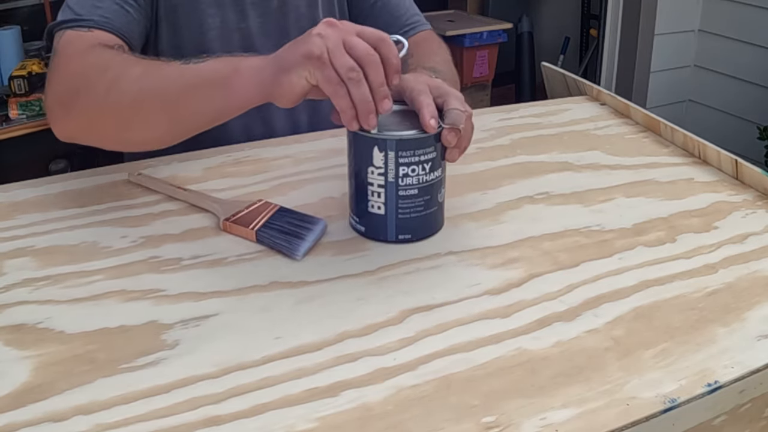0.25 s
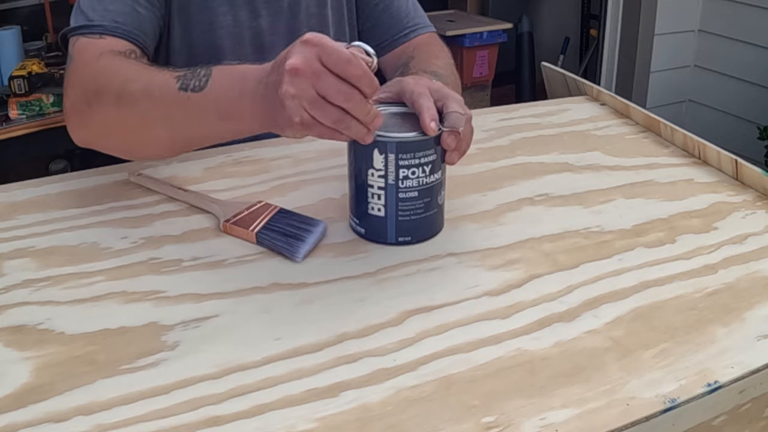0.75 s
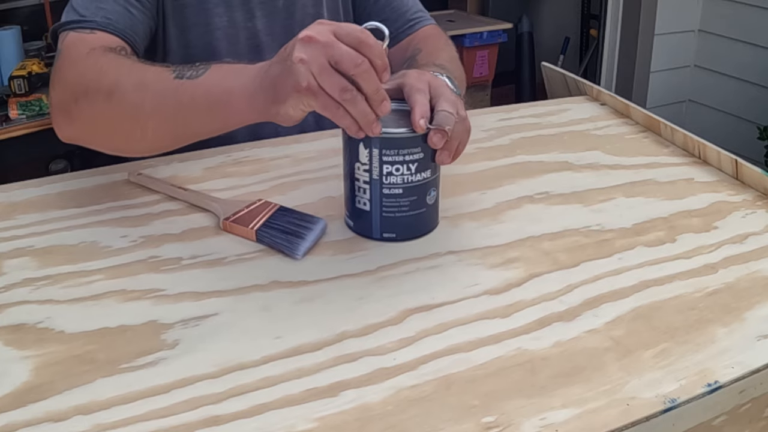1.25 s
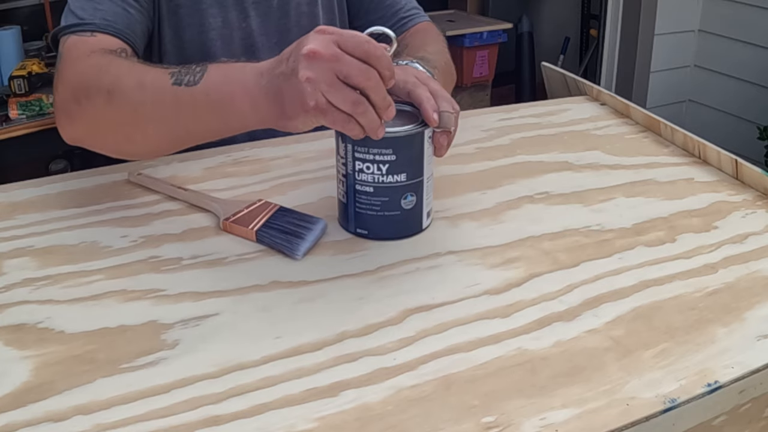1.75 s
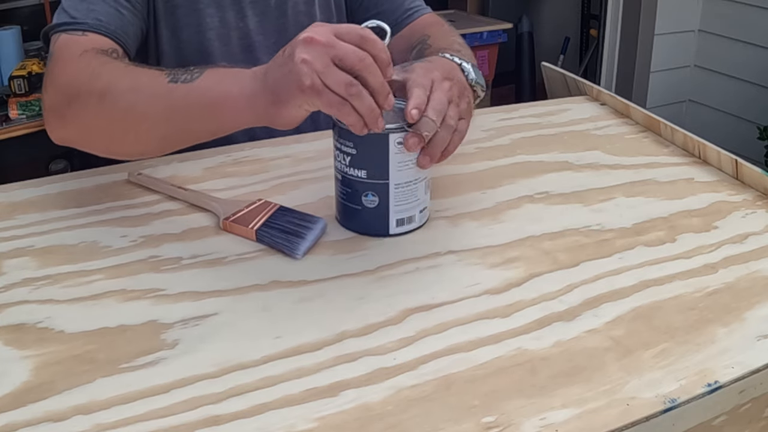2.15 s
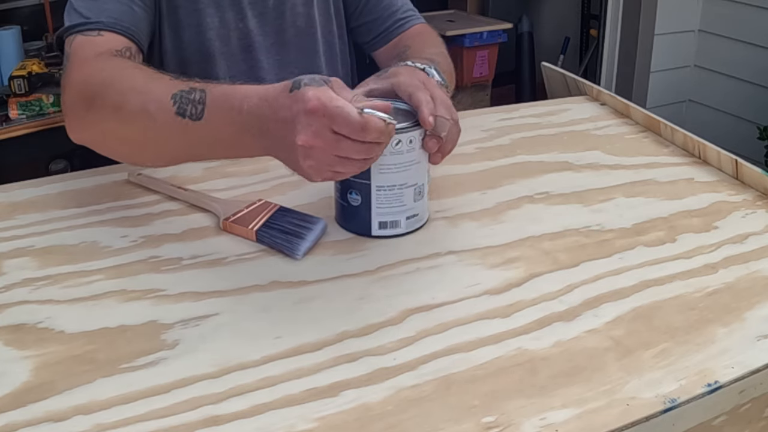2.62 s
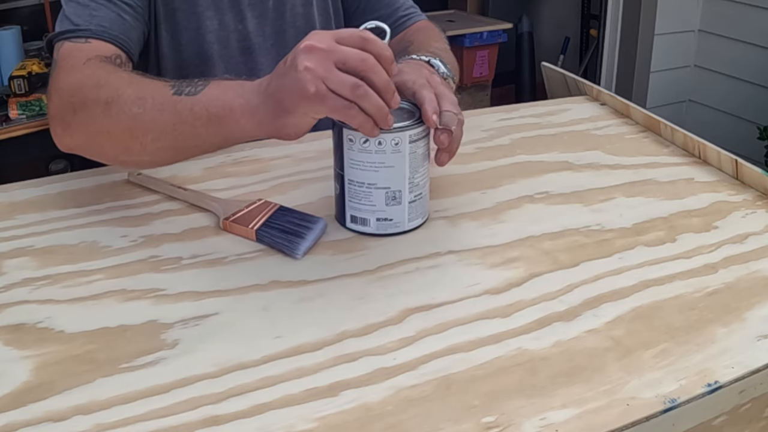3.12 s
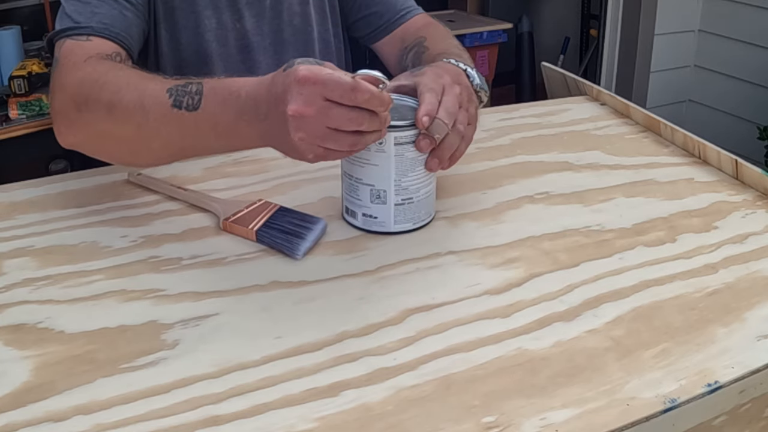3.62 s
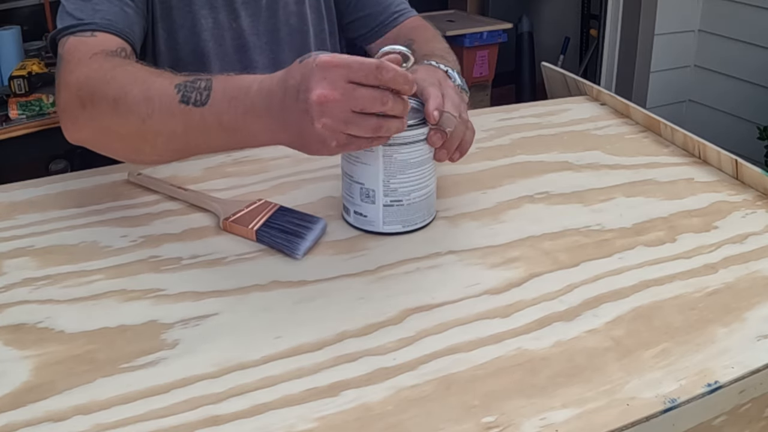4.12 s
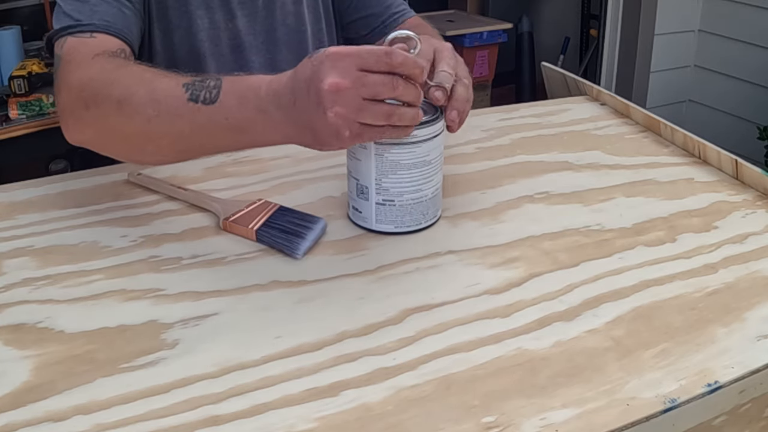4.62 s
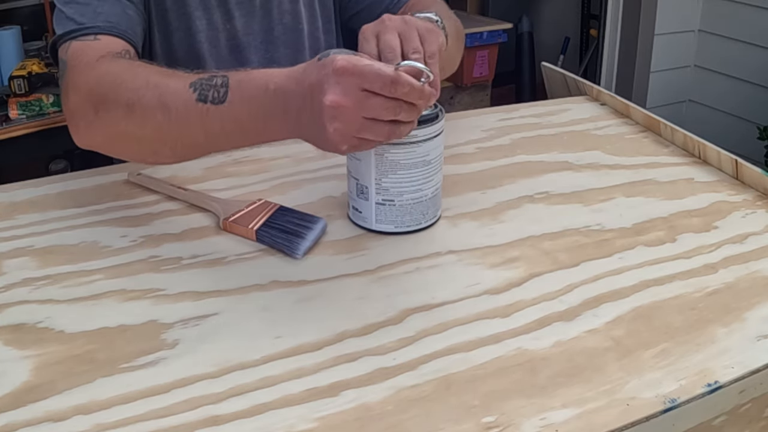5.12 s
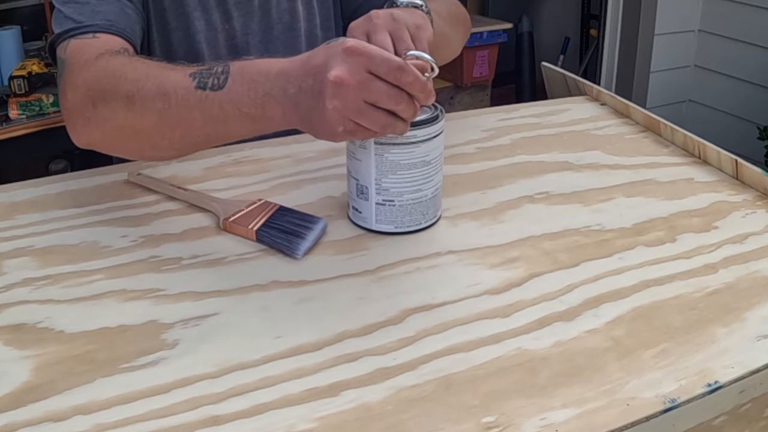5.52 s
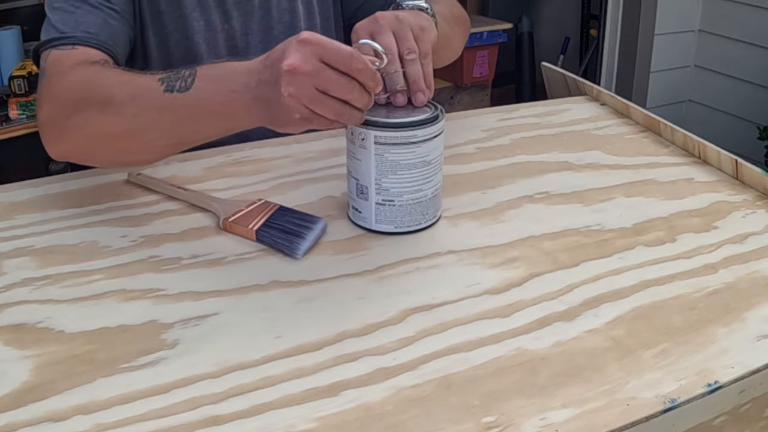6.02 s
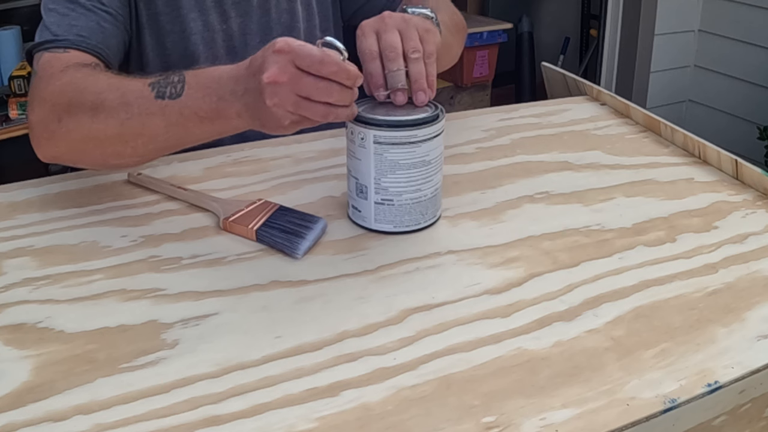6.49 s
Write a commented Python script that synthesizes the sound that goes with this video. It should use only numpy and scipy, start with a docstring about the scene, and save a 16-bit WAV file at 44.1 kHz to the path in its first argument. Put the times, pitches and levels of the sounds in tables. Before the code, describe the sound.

Sharp clicks and a ringing snap of a paint can lid being pried, with gritty turns on a wooden bench and light wind.

```python
"""A steel key pries round the lid of a full paint can on a plywood bench in an open workshop.
A machine drones outside throughout. First the key clicks on the rim, then slips off with a ringing snap.
A draught starts to buffet the microphone, a brief hiss swells close by, and the can is turned in short
goes, rasping on the wood, while an insect trills faintly now and then and fingers shift their grip.
More clicks follow, and near the end the key scrapes along the rim, squeaks and clicks a last time."""
import sys
import numpy as np
from scipy import signal
from scipy.fft import rfft, irfft
from scipy.io import wavfile
from scipy.ndimage import uniform_filter1d, map_coordinates

SR = 44100
rng = np.random.default_rng(int(sys.argv[2]) if len(sys.argv) > 2 else 0)


def generate_wav(signal):
    """Clip the signal to [-1, 1] and save it as 16-bit WAV at the path in sys.argv[1]."""
    frames = np.transpose(np.atleast_2d(signal))
    scaled = np.clip(frames, -1, 1) * 32767
    pcm = np.round(scaled).astype(np.int16)
    wavfile.write(sys.argv[1], SR, pcm)


N = 297675
TIME = np.arange(N) / SR
GRIP_S = 0.025  # how fast the gripping hand damps the can

# The notes of the full can. Each row: pitch in Hz, level in dB, seconds to fade by 60 dB.
CAN_NOTES = [(628, 0, .15), (680, -9, .05), (845, -10, .09), (1810, -23, .04), (3640, -31, .04)]
# The tone of four kinds of noise. Each row: frequency in Hz, level in dB.
LID_CLACK = [(150, -17), (600, 1), (1000, 12.5), (1400, 4.5), (1900, 0.5), (2400, -1.5), (3200, 1.5),
             (4100, -15), (6000, -10.5), (14000, -66)]
STEEL_TICK = [(1500, -32), (4000, -21.5), (4800, -2), (5800, -0.5), (7000, -10.5), (9000, -15),
              (11500, -16.5), (14000, -41)]
BENCH_THUD = [(35, -12.5), (70, 6.5), (200, -2.5), (420, -4.5), (700, -13), (1100, -22.5), (3000, -32),
              (14000, -109)]
GRIT_TONE = [(210, -1.5), (350, -4.5), (469, -17), (629, 4), (723, -19.5), (1020, -6), (1400, -11.5),
             (1850, -11.5), (2160, -17), (2640, -15.5), (3600, -20), (4200, -23.5), (5810, -29),
             (8160, -34.5), (11800, -38), (14000, -56)]


def amp(db):
    """Turns decibels into a number to multiply by."""
    return 10 ** (np.asarray(db) / 20)


def unit(x):
    """Scales a sound to an average (rms) level of 1."""
    return x / np.sqrt(np.mean(x ** 2) + 1e-20)


def struck(x, size=882):
    """Scales a blow to an average level of 1 over its first samples, normally 20 ms of them."""
    return x / np.sqrt(np.mean(x[:size] ** 2) + 1e-20)


def read(points, hz):
    """Looks up a value between a table's rows, spacing the frequencies by octaves."""
    row_hz, value = np.transpose(points)
    return np.interp(np.log(hz + 1), np.log(row_hz + 1), value)


def add(mix, s, sound):
    """Mixes a sound in, starting at s seconds."""
    part = mix[max(round(s * SR), 0):][:len(sound)]
    part += sound[:len(part)]


def colour(x, tone, size=4096):
    """Gives a sound the tone in a table, with a filter that never rings ahead of a blow."""
    log_gain = np.log(amp(read(tone, abs(np.fft.fftfreq(size, 1 / SR)))))
    taps = np.fft.ifft(np.exp(np.conj(signal.hilbert(log_gain)))).real[:size // 2]
    return signal.fftconvolve(x, taps)[:len(x)]


def wander(hz):
    """A random wobble of average size 1, moving up to about hz times a second."""
    keep_slow = 1 / (1 + (np.fft.rfftfreq(N, 1 / SR) / hz) ** 4)
    return unit(irfft(rfft(rng.standard_normal(N)) * keep_slow, N))


def ring(notes, t, detune=0.):
    """The fading notes of a struck object; detune shifts each pitch by chance."""
    return sum(amp(db - 60 * t / fade_s) * np.sin(2 * np.pi * hz * (1 + detune * rng.standard_normal()) * t)
               for hz, db, fade_s in notes)


def contact(t, fade_s, crunch, rise_s=0.00047):
    """The force of one sharp impact and a short crunch of steel on steel."""
    force = rng.standard_normal(len(t)) * np.exp(-t / fade_s) * (1 - np.exp(-t / rise_s))
    force *= crunch / np.linalg.norm(force)
    force[0] += 1
    return force


def stroke(start, length, change_db, attack_s, release_s, grab_db=0, grab_s=0.02):
    """Loudness of one movement: it breaks free (grab_db louder), swells or eases, and dies away."""
    t = np.maximum(TIME - start, 0)
    attack = np.minimum(t / attack_s, 1)
    push_db = grab_db * np.exp(-(t / grab_s) ** 2) + change_db * np.minimum(t / length, 1)
    release = np.exp(-np.maximum(t - length, 0) / release_s)
    return attack * amp(push_db) * release


def slips(per_s, spread_db, judder_db, smooth):
    """The force of friction: uneven little slips over a smooth rub, coming in clumps."""
    slipping = rng.random(N) < per_s / SR
    sizes = amp(spread_db * np.minimum(rng.exponential(1, N), 4))
    jolts = slipping * sizes * rng.choice([-1, 1], N)
    return (unit(jolts) + smooth * rng.standard_normal(N)) * amp(judder_db * wander(42))


def rubbed(force, notes, damp_s, pitch_ratio, drift=.018):
    """Rubbing sounds an object's notes, damped by the hand; they drift as the contact travels."""
    t = TIME[:SR // 2]
    sound = signal.fftconvolve(force, ring(notes, pitch_ratio * t) * np.exp(-t / damp_s))[:N]
    position = np.cumsum(1 + drift * wander(14))
    return unit(map_coordinates(sound, [position], order=3, mode="mirror"))


def outdoors(rumble_db=-42, hiss_db=-68.5, swell_db=0.27):
    """The open air: a far, gently swelling rumble and a faint hiss."""
    # The tone of each. Each row: frequency in Hz, level in dB.
    rumble_tone = [(15, -1), (45, 1), (75, 2.5), (90, 1.5), (125, 0), (145, -5.5), (170, -11), (250, -12.5),
                   (300, -15.5), (510, -18), (580, -22.5), (1000, -22), (1450, -27.5), (2100, -42),
                   (5000, -89)]
    hiss_tone = [(1500, -3.5), (2100, 1.5), (2800, 2.5), (3800, -4.5), (5500, -1.5), (7500, -7),
                 (8300, -14), (12000, -20), (14000, -32)]
    # How alike left and right are. Each row: frequency in Hz, likeness from 0 to 1.
    likeness = [(60, 0.99), (150, 1), (370, 0.89), (910, 0.43), (2260, 0.31), (5590, 0.7), (13800, 0.42)]
    hz = np.fft.rfftfreq(N, 1 / SR)
    left, other = rfft(rng.standard_normal((2, N)))
    same = np.clip(read(likeness, hz), 0, 1)
    noise = np.array([left, same * left + np.sqrt(1 - same ** 2) * other])
    rumble = unit(irfft(noise * amp(read(rumble_tone, hz)), N))
    hiss = unit(irfft(noise * amp(read(hiss_tone, hz)), N))
    return amp(rumble_db + swell_db * wander(9.9)) * rumble + amp(hiss_db) * hiss


def machine(waver_hz=2.87, flutter_db=1.9):
    """A distant machine drones on one low, wavering note."""
    # The course of the drone. Each row: time in seconds, pitch in Hz, level in dB.
    drone = [(0, 132.3, -44.5), (.8, 136.4, -59.5), (3.299, 130.5, -49.5), (4.3, 131.9, -49),
             (5.1, 129.5, -44.5), (6.75, 130, -47.5)]
    s, hz, db = np.transpose(drone)
    cycles = np.cumsum(np.interp(TIME, s, hz) + waver_hz * wander(9.46)) / SR
    loudness = uniform_filter1d(amp(np.interp(TIME, s, db)), size=300)
    return loudness * unit(np.sin(2 * np.pi * cycles) * amp(flutter_db * wander(14)))


def key_clicks(clack_db=-15, tick_db=-6, knock_db=-7, thud_db=-3):
    """Each bite of the key clacks the lid, rings the rim, knocks the can and thuds into the bench."""
    # Each row: time in seconds, strength in dB, then dB added to it for the can's knock, the steel's tick,
    # the rim's ring and the bench's thud, and last the fade time of the crunch in seconds.
    clicks = [(0.0367, -28, -3, -14.5, -26, -5.5, 0.0025), (0.0495, -30, 1, -19, -35, 0, 0.0017),
              (0.9732, -34.5, -13, -9.5, -18, -14, 0.0047), (1.2724, -42, -1, -21, -25, 5, 0.002),
              (2.092, -45.5, -1, -14.5, -19, -25, .003), (2.309, -39.5, -11, -14, -13, -22, 0.002),
              (2.716, -28, -28, -16, -29, 1, 0.0016), (2.7302, -25.5, -21, -12, -20.5, -13, 0.0014),
              (2.742, -39, -10, -28, -19, -14, 0.0072), (2.8337, -31, -5, -16, -34, -6, 0.0038),
              (3.067, -34.5, 2, -16, -37, -1.5, 0.0022), (3.184, -34, 1.5, -26, -39, -7, 0.0023),
              (3.213, -23, -10, -22, -26.5, -15, 0.002), (5.083, -45.5, -17, -8, -13, 1.5, 0.0025),
              (5.3755, -43.5, -7, -14, -10.5, 1, 0.0035), (5.574, -25.5, -7.5, -21, -30, -13.5, 0.00075),
              (5.635, -46, 5, -14.5, -18, -10, .003), (5.820, -45.5, -17, -7, -19, 5, 0.0075),
              (5.856, -37, -21, -7.5, -12.5, 0.5, 0.0057), (6.65, -40.5, 0, -33, -17, 2, 0.0024)]
    out, t = np.zeros(N), TIME[:SR // 3]
    for s, db, can_db, steel_db, rim_db, bench_db, crunch_s in clicks:
        force = contact(t, crunch_s, crunch=12)
        add(out, s, amp(db + clack_db) * struck(colour(force, LID_CLACK)))
        add(out, s, amp(db + steel_db + tick_db) * struck(colour(force, STEEL_TICK)))
        add(out, s, amp(db + rim_db) * struck(signal.fftconvolve(force, rim_ring(t, detune=0.027))))
        knock = ring(CAN_NOTES, t, detune=0.041) * np.exp(-t / GRIP_S)
        add(out, s, amp(db + can_db + knock_db) * struck(knock))
        thud = colour(contact(t, fade_s=0.029, crunch=4.6), BENCH_THUD)
        add(out, s, amp(db + bench_db + thud_db) * struck(thud))
    return out


def rim_ring(t, detune, top_hz=12600):
    """The rim's ring, shifted by where it is touched; its highest treble is damped."""
    return signal.sosfilt(signal.butter(4, top_hz, fs=SR, output="sos"), ring(rim_notes(), t, detune))


def rim_notes():
    """The notes of the steel rim, whether it is struck or rubbed."""
    # Each row: pitch in Hz, level in dB, seconds to fade by 60 dB.
    notes = [(1450, 1, 0.028), (2660, -6, 0.02), (3380, -3, 0.027), (3670, -4, 0.028), (4620, -9, 0.022),
             (5020, -6, 0.022), (5430, -2, 0.02), (5830, -6, 0.022), (6400, -8, 0.018), (7150, -11, 0.017),
             (8550, -17, 0.01), (9800, -17, 0.014), (10300, -18, 0.014), (12000, -18, 0.012)]
    return notes


def panel_bumps():
    """As the can rocks or the lid flexes, one panel gives way and swings, making a bump or a ping."""
    # Each row: start in seconds, level in dB, pitch in Hz, seconds to fade by 60 dB.
    bumps = [(0.0367, -41, 1380, 0.0032), (0.0488, -56, 4800, 0.016), (0.037, -49, 2650, 0.061),
             (0.0505, -32, 670, 0.035), (2.7145, -32.5, 595, 0.067), (2.7155, -50, 3050, 0.0096),
             (2.717, -38, 405, 0.022), (2.7232, -21, 153.5, 0.071), (2.732, -40.5, 1480, 0.0066),
             (2.733, -39, 832, 0.064), (2.834, -48.5, 2650, 0.01), (3.031, -30, 146, 0.053),
             (3.068, -43.5, 646, 0.16), (3.214, -48, 820, .09), (3.881, -58.5, 3180, 0.0092),
             (5.574, -38, 1005, 0.012), (5.5754, -35, 241, 0.029), (5.5735, -49.5, 5530, 0.0081),
             (5.635, -49.5, 1490, 0.014), (5.8565, -38.5, 397, 0.027), (6.649, -52.5, 2520, 0.0075)]
    out, t = np.zeros(N), TIME[:SR // 3]
    for s, db, hz, fade_s in bumps:
        swing = ring([(hz, 0, fade_s)], t) * (1 - np.exp(-t * hz))
        add(out, s, amp(db) * struck(swing))
    return out


def lid_snap(at_s=0.3555, skid_s=0.003, rebound_s=0.0049,
             skid_db=-42, lid_db=-29, rebound_db=-15, clack_db=-33, thud_db=-29):
    """The key skids ever faster and slips off; the strained lid springs back, rings and rebounds once."""
    # The notes of the lid. Each row: pitch in Hz, level in dB, seconds to fade by 60 dB.
    lid_notes = [(945, -10, 0.28), (987, 12, 0.015), (1270, -14, 0.2), (1410, 3.5, 0.023),
                 (1610, -6, 0.059), (2110, -8, 0.091), (2680, -9.5, 0.16), (2770, 14.5, 0.013),
                 (2880, 0, 0.019), (3300, -19, 0.23), (3630, 3, 0.022), (4030, -21, .04), (4820, -8, 0.024),
                 (5500, -28, .12), (5940, 5, 0.0076), (7560, -5, 0.01), (8700, -6, 0.013)]
    out, t = np.zeros(N), TIME[:SR // 2]
    swell = np.linspace(0, 1, int(skid_s * SR) + 2) ** 2
    force = np.pad(swell * rng.standard_normal(len(swell)), (0, SR // 20))
    skid = struck(colour(force, STEEL_TICK)) + struck(colour(force, LID_CLACK))
    add(out, at_s - skid_s, amp(skid_db) * skid)
    lid = amp(lid_db) * struck(ring(lid_notes, t) * (1 - np.exp(-t / .0005)))
    add(out, at_s, lid)
    add(out, at_s + rebound_s, amp(rebound_db) * lid * np.exp(-t / GRIP_S))
    add(out, at_s, amp(clack_db) * struck(colour(contact(t, fade_s=0.00049, crunch=1.1), LID_CLACK)))
    add(out, at_s, amp(thud_db) * struck(colour(contact(t, fade_s=0.038, crunch=0.98), BENCH_THUD)))
    return out


def air_pressure(breeze_db=-35):
    """The push of air on each side of the microphone: smooth puffs over a light breeze."""
    # Each row: time of the puff's peak in seconds, length in seconds, level in dB, left minus right in dB.
    gusts = [(0.997, 0.043, -24, 0), (1.042, 0.072, -26.5, -4), (1.214, 0.14, -28, -7),
             (1.441, 0.018, -24.5, 5), (1.705, 0.13, -20, -3.5), (1.818, 0.044, -23, -5),
             (2.22, 0.066, -29.5, -8), (2.56, 0.056, -31.5, -6), (2.653, 0.064, -23, -7),
             (2.76, 0.13, -23.5, -4), (2.895, 0.036, -29.5, -7), (3.04, 0.019, -23, -7),
             (3.113, 0.052, -35.5, 5), (4.005, 0.15, -30.5, -1.5)]
    breeze = amp(breeze_db) * stroke(start=0.862, length=2.11, change_db=0, attack_s=0.036, release_s=0.3)
    power = breeze ** 2
    for s, length, db, lean_db in gusts:
        sides = amp([[db + lean_db / 2], [db - lean_db / 2]])
        power = power + (sides * np.exp(-2 * ((TIME - s) / length) ** 2)) ** 2
    return np.sqrt(power)


def draught(corner_hz=130, widen_db=32, slope=3.1, tilt=0.68, low_hz=22, shared=0.56):
    """Air swirls at each side of the microphone; stronger gusts reach higher in pitch."""
    hz, s, noise = signal.stft(rng.standard_normal((3, N)), SR, nperseg=1024, noverlap=768)
    pressure = air_pressure()
    pressure_db = 20 * np.log10(np.interp(s, TIME, pressure.mean(0)) + 0.00082)
    cutoff_hz = corner_hz * 10 ** ((pressure_db + 27.5) / widen_db)
    tone = (hz[:, None] + low_hz) ** -tilt / (1 + (hz[:, None] / cutoff_hz) ** slope)
    swirls = signal.istft(noise * tone, nperseg=1024, noverlap=768)[1][:, :N]
    swirls = signal.sosfilt(signal.butter(2, low_hz, "high", fs=SR, output="sos"), swirls)
    sides = shared * swirls[2] + (1 - shared) * swirls[:2]
    # even out the level, so each swirl carries about the pressure of its gust
    sides /= np.sqrt(uniform_filter1d(uniform_filter1d(sides ** 2, size=2400), size=1200) + 1e-12)
    return sides * pressure


def close_hiss(start_db=-62.5, lean_db=3.5, room_db=-7):
    """A brief, close, swelling hiss, louder on the left, like a brushing sleeve."""
    # The tone of the hiss. Each row: frequency in Hz, level in dB.
    brush_tone = [(1800, -12), (2800, 4), (4300, -6.5), (6300, 0.5), (8500, -9), (11800, -3.5),
                  (14000, -20)]
    swell = stroke(start=1.010, length=0.055, change_db=18, attack_s=0.018, release_s=0.011)
    hiss = amp(start_db) * swell * unit(colour(rng.standard_normal(N), brush_tone))
    return amp([[lean_db / 2], [-lean_db / 2]]) * hiss + amp(room_db) * workshop_echo(hiss)


def can_turning(grit_db=5):
    """The can's bottom seam drags over wood fibres, rasping and making the can hum."""
    # Each row: start and length in seconds, rasp and hum in dB, level change in dB, fade in seconds.
    turns = [(1.241, 0.078, -55.5, -48, -3, 0.009), (1.326, 0.22, -55, -48.5, 3.5, 0.021),
             (2.13, 0.18, -45, -49, -0.5, 0.009), (2.243, 0.055, -64, -43, 7, 0.0095),
             (2.727, 0.3, -51, -59, -5, 0.0095), (3.506, 0.049, -54.5, -51, -2, .015),
             (3.82, 0.15, -56.5, -47.5, -1, 0.013), (3.98, 0.053, -73, -46, -3, 0.024),
             (4.432, 0.14, -49, -51, -7.5, 0.02)]
    force = slips(per_s=2600, spread_db=5, judder_db=1.5, smooth=0.5)
    rasp = amp(grit_db) * unit(colour(force, GRIT_TONE))
    hum = rubbed(force, CAN_NOTES, damp_s=0.037, pitch_ratio=0.96)
    return sum(stroke(s, length, change_db, attack_s=0.017, release_s=fade_s, grab_db=4)
               * (amp(rasp_db) * rasp + amp(hum_db) * hum)
               for s, length, rasp_db, hum_db, change_db, fade_s in turns)


def gritty_catches(rim_db=-6, can_db=-3, grit_db=-5, thud_db=-2, grain_spread_db=5.5):
    """Short gritty catches of steel (seam on wood, or key on rim) ring the can and jog the bench."""
    # Each row: start and length in seconds, rim ring in dB, knock (can, grit and thud) in dB.
    catches = [(1.258, 0.0037, -62, -66), (1.265, 0.005, -56, -57), (1.298, 0.0096, -55, -50),
               (1.352, 0.0045, -64, -57), (1.407, .005, -57, -48), (1.443, 0.009, -47.5, -62),
               (1.464, 0.007, -45, -51), (2.144, 0.026, -43.5, -48), (2.29, 0.011, -43, -46.5),
               (3.506, 0.003, -56.5, -48), (3.586, .004, -59, -63), (3.617, 0.004, -55, -61),
               (3.825, 0.01, -45.5, -47), (3.859, 0.0071, -68, -45), (3.878, 0.008, -58, -50),
               (3.898, 0.005, -64, -47), (3.92, 0.0094, -47, -42.5), (3.983, 0.005, -65, -43),
               (3.995, 0.0032, -73, -52), (4.002, 0.0077, -70, -44), (4.42, .005, -72, -51),
               (4.448, 0.013, -50, -45.5), (4.471, 0.0096, -54, -49), (4.507, 0.0092, -48.5, -46),
               (4.538, 0.0076, -52, -51), (4.558, 0.0095, -53, -49.5), (4.585, 0.0078, -57, -46.5),
               (6.050, 0.0035, -65, -52)]
    attack_s, release_s = .0015, 0.0017
    out, t = np.zeros(N), TIME[:SR // 8]
    for s, length, steel_db, knock_db in catches:
        push = np.minimum(t / attack_s, 1) * np.exp(-np.maximum(t - length, 0) / release_s)
        jolts, grain_sizes = rng.standard_normal((2, len(t)))
        force = push * jolts * amp(grain_spread_db * grain_sizes)
        samples = int((length + release_s) * SR)
        steel = signal.fftconvolve(force, rim_ring(t, detune=.03))
        can = signal.fftconvolve(force, ring(CAN_NOTES, t, detune=0.058) * np.exp(-t / GRIP_S))
        add(out, s, amp(steel_db + rim_db) * struck(steel, samples))
        add(out, s, amp(knock_db + can_db) * struck(can))
        add(out, s, amp(knock_db + grit_db) * struck(colour(force, GRIT_TONE), samples))
        add(out, s, amp(knock_db + thud_db) * struck(colour(force, BENCH_THUD)))
    return out


def insect(hz=7420, width_hz=130, pulses_per_s=99, fade_s=0.046):
    """An insect sings short trills of fast, high pulses."""
    # Each row: start in seconds, end in seconds, level in dB.
    trills = [(1.3, 1.62, -76), (3.23, 3.515, -75), (5.702, 6.03, -75)]
    throb = (1 + np.cos(2 * np.pi * pulses_per_s * TIME + .5 * wander(8.5))) ** 1.4
    song = unit(throb * np.sin(2 * np.pi * np.cumsum(hz + width_hz * wander(760)) / SR))
    return song * sum(amp(db) * np.clip(np.minimum(TIME - start, end - TIME) / fade_s, 0, 1)
                      for start, end, db in trills)


def fingers(flutter_db=2.5):
    """Skin slides on the can with a soft hiss as the fingers shift their grip."""
    # Each row: start and length in seconds, level in dB, level change over the move in dB.
    moves = [(1.87, 0.37, -65, 10), (3.348, 0.3, -58.5, -1.5), (4.096, 0.24, -57, 4),
             (4.70, 0.23, -79.5, 19)]
    # The tone of sliding skin. Each row: frequency in Hz, level in dB.
    skin_tone = [(300, 0.5), (900, 6), (2000, -3.5), (4000, -13.5), (7000, -19.5), (9000, -24),
                 (12000, -24), (14000, -44)]
    rub = unit(colour(rng.standard_normal(N), skin_tone)) * amp(flutter_db * wander(33))
    return rub * sum(amp(db) * stroke(s, length, change_db, attack_s=0.016, release_s=0.037)
                     for s, length, db, change_db in moves)


def key_dragging(hum_db=-4):
    """The key scratches along the rim in tiny slips that make it sing; the can hums under the push."""
    # Each row: start and length in seconds, then scratch, can hum, rim ring and level change, all in dB.
    drags = [(2.784, 0.028, -38.5, -59, -51.5, -2), (5.764, 0.12, -48.5, -51, -68, -17),
             (5.88, 0.053, -52.5, -63, -58, 7.5), (5.938, 0.057, -47.5, -42, -50.5, -2.5),
             (5.977, 0.24, -60, -43, -72, 0)]
    # The tone of the scratch. Each row: frequency in Hz, level in dB.
    scratch_tone = [(400, 20), (1000, 16), (2000, 11), (2400, 5.5), (3500, -8.5), (4100, -9), (5000, -5),
                    (6500, -12), (7700, -28), (8400, -31), (9300, -16), (10200, -15), (11000, -16),
                    (14000, -49)]
    force = slips(per_s=2200, spread_db=3, judder_db=2.0, smooth=0.6)
    scratch = unit(colour(force, scratch_tone))
    hum = amp(hum_db) * rubbed(rng.standard_normal(N), CAN_NOTES, damp_s=0.069, pitch_ratio=0.95)
    rim = rubbed(force, rim_notes(), damp_s=0.046, pitch_ratio=0.99)
    return sum(stroke(s, length, change_db, attack_s=0.015, release_s=0.011, grab_db=0.5)
               * (amp(scratch_db) * scratch + amp(can_db) * hum + amp(rim_db) * rim)
               for s, length, scratch_db, can_db, rim_db, change_db in drags)


def key_squeak(overtone_db=-10):
    """The tip sticks and slips on the lip of the lid, slowing as it comes to rest."""
    # Each row: time in seconds, level in dB, slips per second.
    glide = [(5.8295, -65, 3300), (5.832, -40.5, 1520), (5.835, -36.5, 690), (5.842, -54, 1120),
             (5.847, -65, 600)]
    s, db, rate = np.transpose(glide)
    phase = 2 * np.pi * np.cumsum(np.interp(TIME, s, rate)) / SR
    loudness = amp(np.interp(TIME, s, db, left=-200, right=-200))
    return loudness * (np.sin(phase) + amp(overtone_db) * np.sin(2 * phase))


def workshop_echo(x, early_db=-11, wall_db=-23, tail_db=-16.5,
                  early_s=0.016, wall_s=0.018, wall_spread_s=0.00051):
    """Sound scatters off bench and body, bounces once off a wall, then dies away in a short tail."""
    # How long the room rings. Each row: frequency in Hz, seconds to fade by 60 dB.
    room_fade = [(100, 0.025), (500, 0.16), (1500, 0.42), (3500, 0.27), (7000, 0.2), (13000, 0.3)]
    t = TIME[:SR // 2]
    echoes = rng.standard_normal((2, len(t))) * (rng.random((2, len(t))) < 3000 / SR)
    echoes += 2.0 * echoes[::-1]  # each echo reaches both sides, one more strongly
    early = echoes * np.exp(-t / early_s) * (t > .002)
    wall = echoes * np.exp(-((t - wall_s) / wall_spread_s) ** 2)
    hz, s, noise = signal.stft(rng.standard_normal((2, len(t))) * (t > .008), SR, nperseg=256)
    fade = amp(-60 * s / read(room_fade, hz)[:, None])
    tail = signal.istft(noise * fade, SR, nperseg=256)[1][:, :len(t)]
    paths = sum(amp(db) * path / np.linalg.norm(path[0])
                for db, path in [(early_db, early), (wall_db, wall), (tail_db, tail)])
    return signal.fftconvolve(x[None], paths, axes=1)[:, :N]


def scene(side_db=0.5, lag_s=.000016):
    """The can stands just right of centre, so its sound reaches the left a little later and softer."""
    can = (key_clicks() + lid_snap() + panel_bumps() + key_squeak()
           + can_turning() + gritty_catches() + key_dragging() + fingers())
    delay = np.exp(-2j * np.pi * np.fft.rfftfreq(N, 1 / SR) * lag_s)
    direct = np.array([amp(-side_db) * irfft(rfft(can) * delay, N), amp(side_db) * can])
    return direct + workshop_echo(can) + close_hiss() + outdoors() + machine() + insect() + draught()


def record(dry, top_hz=14200):
    """Cuts off the very highest treble."""
    low_pass = signal.firwin(255, top_hz, window=("kaiser", 9), fs=SR)
    return signal.oaconvolve(dry, low_pass[None], "same")


dry = scene()
out = record(dry)
generate_wav(out)
```